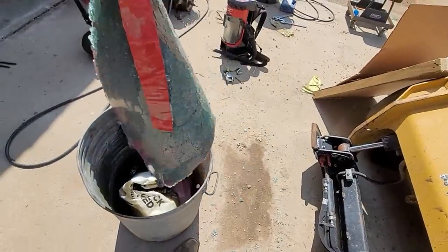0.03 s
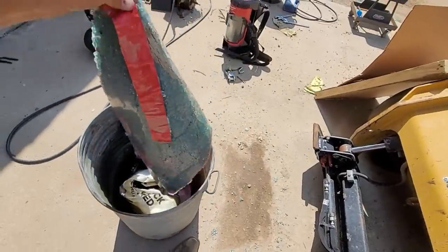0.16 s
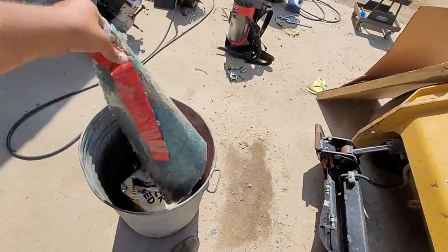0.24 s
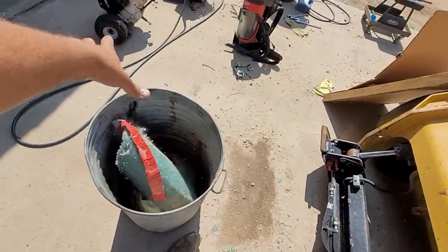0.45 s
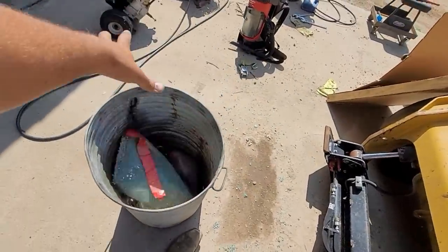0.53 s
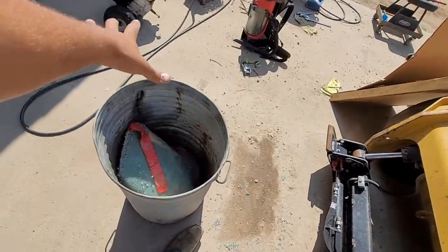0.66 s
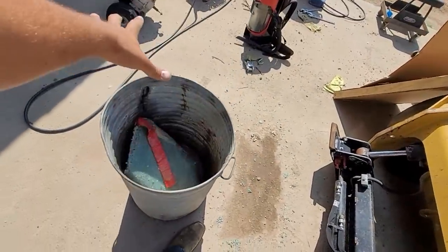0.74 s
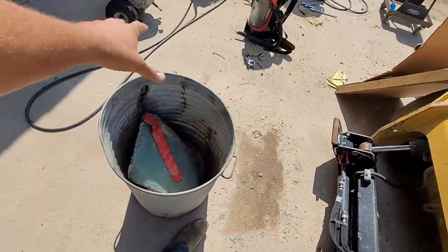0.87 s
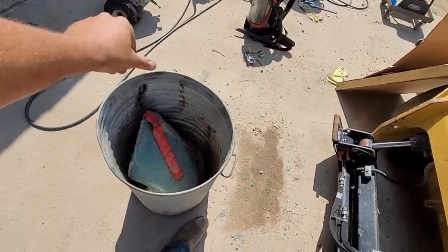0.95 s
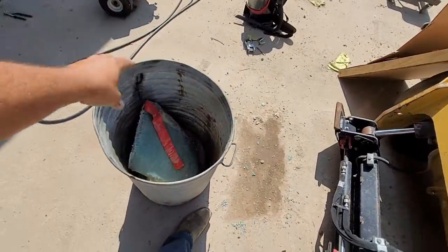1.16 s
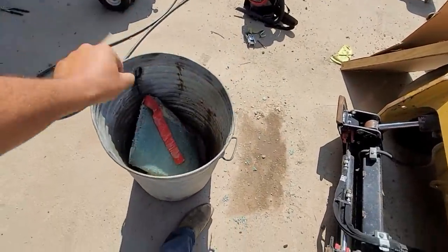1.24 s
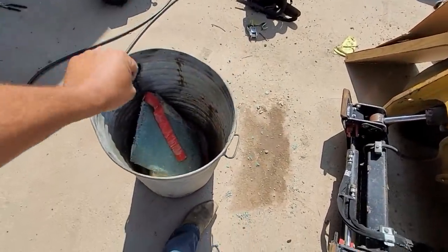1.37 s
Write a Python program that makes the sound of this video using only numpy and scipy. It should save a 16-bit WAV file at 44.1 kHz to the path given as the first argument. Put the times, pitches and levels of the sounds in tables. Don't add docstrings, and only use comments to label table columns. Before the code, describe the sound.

A crumbling sheet of safety glass tinkles faintly in the hand, brushes the rim, then crashes into a metal can with dense bright rattle and hollow drumming, followed by crackles and thuds; close outdoor stereo microphone.

```python
import sys
import numpy as np
from scipy import signal
from scipy.fft import rfft, irfft, next_fast_len
from scipy.io import wavfile
from scipy.ndimage import map_coordinates

SR = 44100
rng = np.random.default_rng(int(sys.argv[2]) if len(sys.argv) > 2 else 0)


def inscribe(sig):
    pcm = np.round(np.clip(np.atleast_2d(sig).T, -1, 1) * 32767)
    wavfile.write(sys.argv[1], SR, pcm.astype(np.int16))


def decibels_to_gain(level_db):
    exponent = np.asarray(level_db, float) / 20
    return 10 ** exponent


N = 61739
LENGTH_S = N / SR
PORT_LAG_S, THUD_LAG_S = 0.000367, 0.00012


def unit(x):
    return x / np.sqrt(np.mean(x ** 2) + 1e-20)


def along(points, hz):
    point_hz, value = np.transpose(points)
    return np.interp(np.log(hz + 1), np.log(point_hz + 1), value)


def at(rows, s):
    row_s, *columns = np.transpose(rows)
    return [np.interp(s, row_s, column) for column in columns]


def wobble(rate, s):
    return map_coordinates(rng.standard_normal(300), [s * rate])


def filtered(x, response):
    size = next_fast_len(N + SR // 4)
    hz = np.fft.rfftfreq(size, 1 / SR)
    return irfft(rfft(x, size) * response(hz), size)[..., :N]


def body(peaks):
    def response(f):
        total = 0
        for k, (hz, width_hz, db) in enumerate(peaks):
            push = 1j * f * width_hz
            total = total + (-1) ** k * decibels_to_gain(db) * push / (hz * hz - f * f + push)
        return total
    return response


def places(s, lag_s):
    lag_spread_s, pan_spread_db = 0.00006, 4.5
    scatter = rng.standard_normal((len(s), 2))
    side = np.array([[-.5], [.5]])
    arrive_s = s + side * (lag_s + lag_spread_s * scatter[:, 0])
    return arrive_s, decibels_to_gain(side * pan_spread_db * scatter[:, 1])


def grains(s, hz, gain, cycles, size):
    out = []
    fade = np.cos(np.arange(size) / size * np.pi / 2)
    for arrive_s, pan in zip(*places(s, PORT_LAG_S)):
        first = np.maximum(np.ceil(arrive_s * SR), 0).astype(int)
        index = first[:, None] + np.arange(size)
        turns = (index / SR - arrive_s[:, None]) * hz[:, None]
        envelope = fade * decibels_to_gain(-60 * turns / cycles) * (1 - np.exp(-turns))
        wave = (gain * pan)[:, None] * envelope * np.sin(2 * np.pi * turns)
        out.append(np.bincount(index.ravel(), wave.ravel(), N + size + SR)[:N])
    return np.array(out)


def blows(s, gain, lag_s):
    out = []
    for arrive_s, pan in zip(*places(s, lag_s)):
        index = np.abs(np.round(arrive_s * SR)).astype(int)
        out.append(np.bincount(index, gain * pan, N + SR)[:N])
    return np.array(out)


def yard():
    # frequency_hz [Hz], level_db [dB per Hz]
    rumble_colour = [(25, -11.5), (65, -6), (140, -14.5), (195, 2.5), (260, -8), (430, -12), (1100, -23.5),
                     (16000, -30.5)]

    def shape(f):
        alike = 1 / (1 + (f / 600) ** 2)
        return decibels_to_gain(along(rumble_colour, f)) * np.sqrt([1 + alike, 1 - alike])

    mid, side = filtered(rng.standard_normal((2, N)), shape)
    return decibels_to_gain(-49.5) * unit(np.array([mid + side, mid - side]))


def rustle():
    # start_s [s], level_db [dB]
    hand_level = [
        (0, -49),
        (.022, -41),
        (.06, -55),
        (.1, -49.5),
        (.135, -70),
        (.2, -49),
        (.23, -59),
        (.24, -100),
    ]
    scatter = rng.standard_normal((260, 2))
    s = rng.random(len(scatter)) * hand_level[-1][0]
    hz = 6530 * np.exp(0.083 * scatter[:, 0])
    level_db = at(hand_level, s)[0] + 4.5 * scatter[:, 1]
    return grains(s, hz, decibels_to_gain(level_db), cycles=71, size=256)


def tap():
    start_s, pitch_hz, level_db = .105, 450, -24
    return grains(np.array([start_s]), np.array([pitch_hz]), decibels_to_gain([level_db]), cycles=12, size=1024)


def crumbs(s, level_db, tilt_db, density):
    cycles, size_spread_db = 14, 4
    hz = 800 + 15400 * rng.random(len(s))
    scatter_db = size_spread_db * np.clip(rng.standard_normal(len(s)), -2, 2)
    gain = decibels_to_gain(level_db + tilt_db * np.log2(hz / 5000) + scatter_db)
    return grains(s, hz, gain * np.sqrt(hz * 80 / (density * cycles)), cycles, size=128)


def rattle():
    # start_s [s], level_db [dB], brightness_db [dB per octave]
    motion = [(0, -41.5, 1), (.03, -40, -1.5), (.135, -73, 3), (.218, -41.5, -5.5), (.243, -14, 0.5),
              (.28, -12, -2), (.36, -7.5, -0.5), (.5, -7.5, 0), (.545, -10.5, -1), (.615, -16, 1),
              (.67, -22, 0), (.8, -20, 1), (.9, -21.5, 1), (1.02, -20.5, 1.5), (1.08, -30.5, -0.5),
              (1.22, -21.5, -1), (1.275, -29, -3), (1.4, -30.5, -0.5)]
    rate = 18000
    s = rng.random(round(rate * LENGTH_S)) * LENGTH_S
    level_db, tilt_db = at(motion, s)
    return crumbs(s, level_db + 0.91 * wobble(60.5, s), tilt_db, rate)


def cracks():
    # start_s [s], peak_db [dB], brightness_db [dB per octave], fall_by_60_db_ms [ms]
    crack_events = [(0.1045, -39, 5, 60), (0.1444, -35.5, 4, 52), (0.185, -32.5, 10, 55),
                    (0.2106, -25.5, 3, 100), (0.2242, -14.5, 0, 47), (0.2758, 1.5, 1.5, 71),
                    (0.5592, -11, 12, 100), (0.6181, -5.5, 1, 70), (0.7361, -3.5, 0.5, 84),
                    (0.8155, -6.5, 5, 70), (0.8624, -16, -4, 53), (0.8936, -5.5, -6.5, 86),
                    (0.9484, -7, -10, 150), (0.9583, -1, 3, 63), (1.0136, -34, 6, 61),
                    (1.0869, -9.5, 5.5, 70), (1.1264, -9, 2, 100), (1.1595, -3.5, 3.5, 67),
                    (1.1913, -11, 5, 46), (1.1985, -19, -2, 48), (1.2308, -46, -6, 36),
                    (1.2944, -22, -12, 84), (1.3114, -15, 3, 83), (1.348, -10.5, 3.5, 81)]
    start_s, peak_db, bright_db, fall_ms = np.transpose(crack_events)[:, :, None]
    late = rng.random((len(crack_events), 400)) ** 1.5
    s = start_s + late * fall_ms / 2000
    level_db = peak_db - 11 - 30 * late
    tilt_db = np.maximum(bright_db, 0) + 0 * late
    return crumbs(s.ravel(), level_db.ravel(), tilt_db.ravel(), 12000)


def shards():
    # start_s [s], pitch_hz [Hz], level_db [dB over typical], life [times typical]
    ringing = [
        (.323, 1500, 5, 1.1),
        (.352, 1380, 8, 1.2),
        (.699, 1450, -5, .6),
        (.952, 1380, -6, 1.4),
        (.958, 8500, 6, 1.1),
        (.959, 5000, 0, 1.1),
        (1.066, 890, -8, .4),
        (1.159, 3450, -5, 1.9),
        (1.2, 3050, -5, 1.1),
        (1.195, 1480, -9, .8),
    ]
    s, hz, level_db, life = np.transpose(ringing)
    return grains(s, hz, decibels_to_gain(level_db - 18), 60 * life[:, None], size=2048)


def glass():
    # frequency_hz [Hz], level_db [dB per Hz]
    glass_colour = [(600, -7), (1050, -5), (1450, -5.5), (2400, -9.5), (4600, -1.5), (6700, -6.5),
                    (9500, -13), (15900, -17)]
    return filtered(rattle() + cracks(), lambda f: decibels_to_gain(along(glass_colour, f))) + shards()


def drumming():
    # start_s [s], level_db [dB]
    load = [(.215, -63), (.238, -16.5), (.285, -11), (.305, -10), (.34, -11.5), (.51, -12), (.56, -16.5),
            (.61, -26), (.675, -29.5), (.74, -20), (.8, -15), (.87, -33.5), (.91, -32.5), (.95, -22.5),
            (1.05, -30), (1.09, -33), (1.4, -35)]
    # frequency_hz [Hz], width_hz [Hz], level_db [dB]
    wall = [(207, 68, 0), (269.4, 40, 6), (316.7, 33, 2.5), (375.3, 32, 1), (478, 57, 0.5),
            (732, 144, -3.5), (900, 107, -7), (1345, 183, -1.5), (1800, 230, -21)]
    # frequency_hz [Hz], width_hz [Hz], level_db [dB]
    floor = [(78, 20.5, 1), (133, 32, 0)]
    rate, floor_growth = 1500, 1.87
    u = rng.random((round(rate * LENGTH_S), 2))
    s = (np.arange(len(u)) + u[:, 0]) / rate
    load_db = at(load, s)[0]
    direction = np.sign(u[:, 1] - .5)
    scatter_db = 4 * rng.standard_normal(len(u))
    knock = direction * decibels_to_gain(scatter_db + load_db + 23.5) * (s > load[0][0])
    heavy = knock * decibels_to_gain((floor_growth - 1.5) * (load_db - load_db.max()))
    wall_sound = filtered(blows(s, knock, PORT_LAG_S), body(wall))
    return wall_sound + filtered(blows(s, heavy, THUD_LAG_S), body(floor))


def thuds():
    # start_s [s], peak_db [dB]
    judder = [(0.639, -22), (0.649, -17), (0.729, -22), (0.744, -19.5), (0.765, -38), (0.788, -39),
              (0.885, -21), (0.929, -19), (0.936, -23), (0.996, -22.5), (1.037, -18), (1.066, -15),
              (1.079, -21), (1.093, -20.5), (1.107, -21), (1.128, -23), (1.146, -22.5), (1.165, -22.5),
              (1.186, -20), (1.207, -20.5), (1.237, -21.5), (1.244, -20.5), (1.266, -48.5), (1.286, -21),
              (1.297, -28), (1.313, -44), (1.33, -24), (1.35, -22), (1.368, -22), (1.385, -26)]
    # frequency_hz [Hz], width_hz [Hz], level_db [dB]
    thud_body = [(87, 118, -3.5), (261, 106, 1.5), (480, 260, -8), (837, 67, -11)]
    s, peak_db = np.transpose(judder)
    return -filtered(blows(s, decibels_to_gain(peak_db + 35), THUD_LAG_S), body(thud_body))


def can():
    return filtered(drumming() + thuds(), lambda f: (1j * f / (50 + 1j * f)) ** 2)


def inside_can(x):
    t = np.arange(SR // 8) / SR
    tail = rng.standard_normal((2, len(t))) * decibels_to_gain(-60 * t / .05)
    tail = tail * (t > .0015)
    echo = signal.fftconvolve(x, tail / np.linalg.norm(tail[0]), axes=1)[:, :N]
    return decibels_to_gain(-6) * echo


def scene():
    background = yard()
    pieces = rustle() + glass()
    return background + pieces + inside_can(pieces) + tap() + can()


def band_limit(x):
    return signal.sosfilt(signal.butter(12, 16010, fs=SR, output="sos"), x)


def record(dry):
    # frequency_hz [Hz], left_over_right_db [dB]
    port_balance = [(60, 3), (180, -0.5), (550, 5), (1650, 4), (4970, -1.5), (15000, 1.5)]
    half = np.array([[.5], [-.5]])
    x = filtered(dry, lambda f: decibels_to_gain(half * along(port_balance, f)))
    x = x / (1 + np.abs(x) ** 6) ** (1 / 6)
    return band_limit(x)


dry = scene()
out = record(dry)
inscribe(out)
```